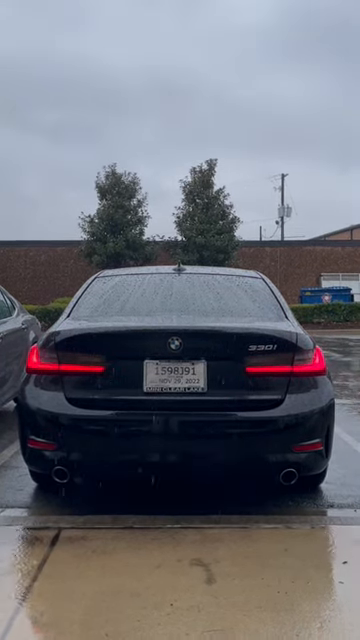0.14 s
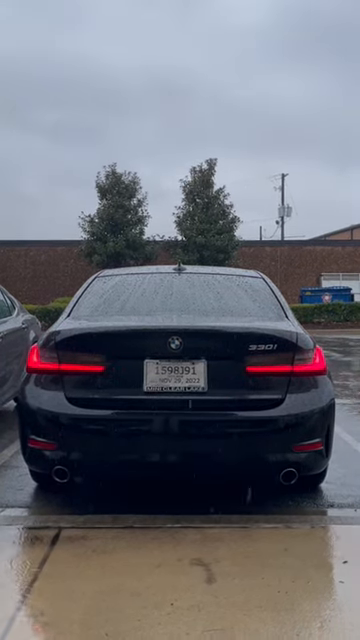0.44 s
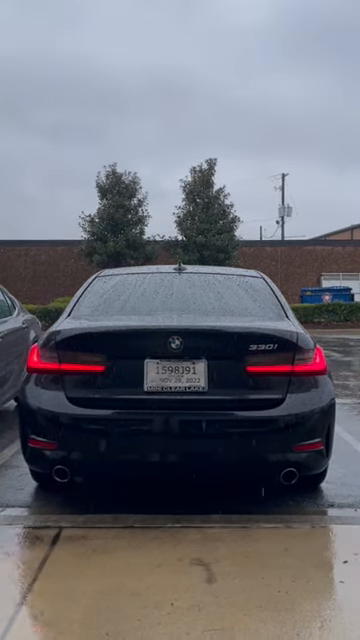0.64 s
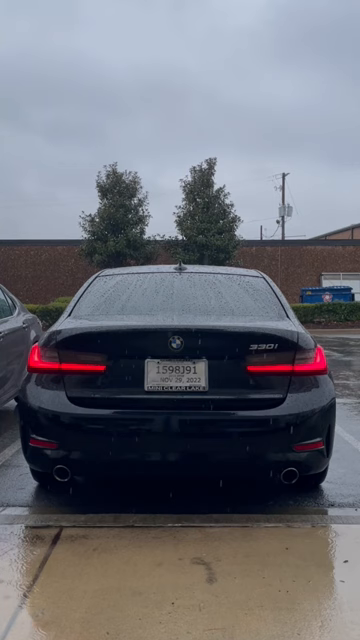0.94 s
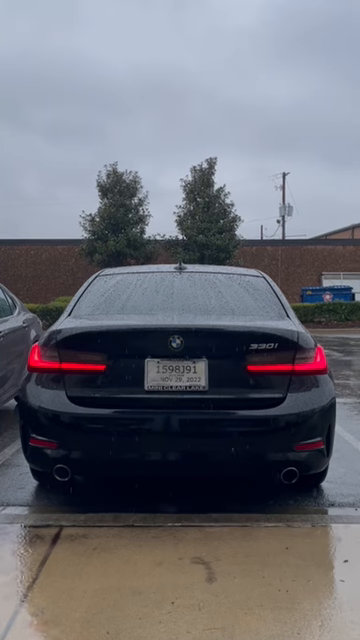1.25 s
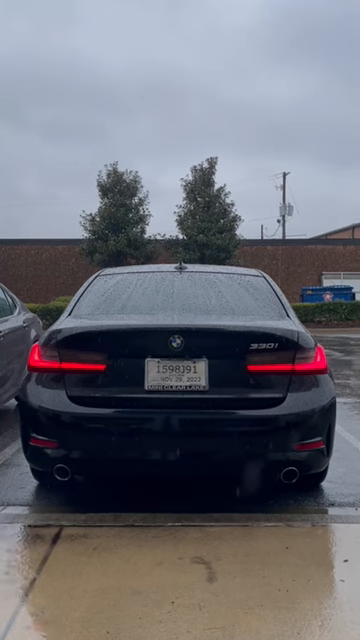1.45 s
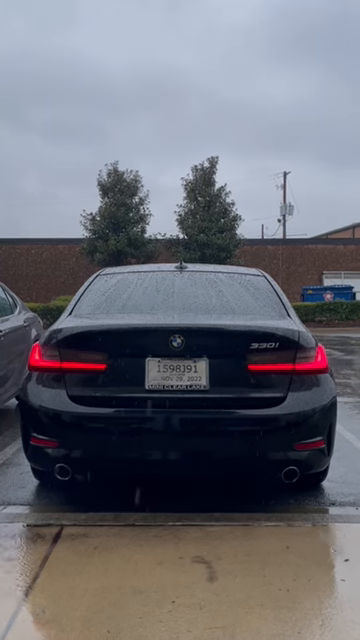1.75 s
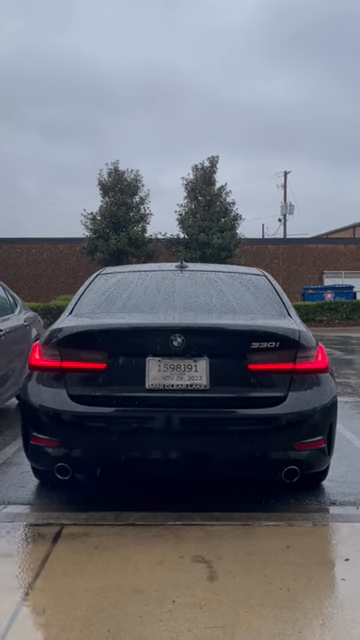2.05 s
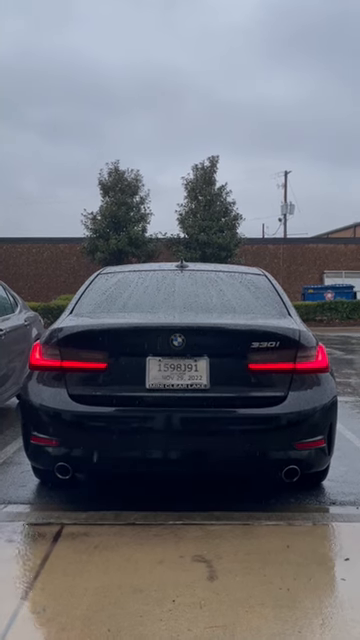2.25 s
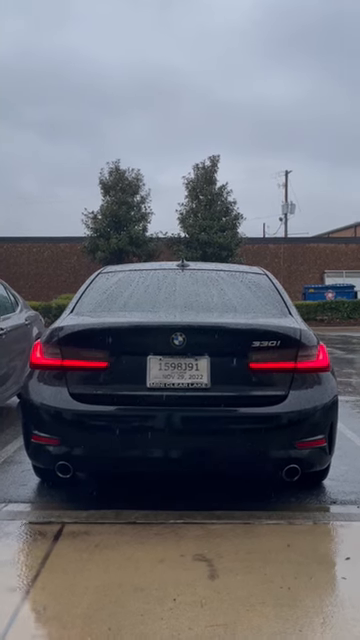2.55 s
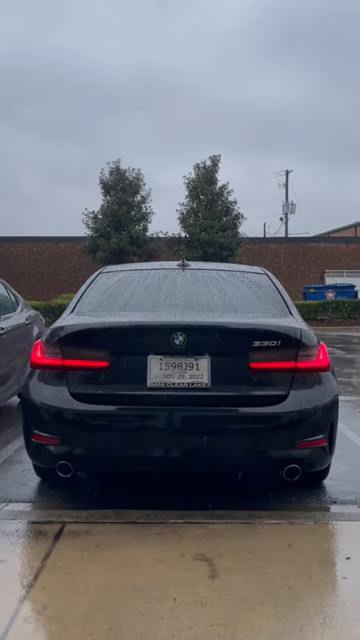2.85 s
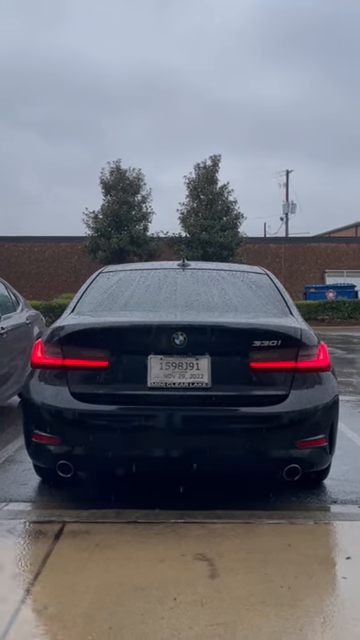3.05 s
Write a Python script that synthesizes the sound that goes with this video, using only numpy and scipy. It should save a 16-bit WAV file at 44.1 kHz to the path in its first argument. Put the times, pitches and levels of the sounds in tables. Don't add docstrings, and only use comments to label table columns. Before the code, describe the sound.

Car engine idling low and throaty from its tailpipes while rain hisses and drips around it

```python
import sys
import numpy as np
from scipy import signal
from scipy.fft import rfft, irfft
from scipy.io import wavfile
from scipy.ndimage import uniform_filter1d

SR = 44100
rng = np.random.default_rng(int(sys.argv[2]) if len(sys.argv) > 2 else 0)


def persist_wave(psi):
    counts = np.round(np.clip(psi, -1, 1) * 32767).astype(np.int16)
    wavfile.write(sys.argv[1], SR, np.atleast_2d(counts).T)


def volts(x):
    e = np.asarray(x, float) / 20
    return 10 ** e


N = 141120


def curve(table, col):
    points = np.array(table, float)
    return np.interp(np.arange(N) / SR, points[:, 0], points[:, col])


def level(x, db):
    return x * volts(db) / np.sqrt(np.mean(x ** 2))


def band(x, hz, width):
    return signal.lfilter(*signal.iirpeak(min(hz, .45 * SR), hz / width, fs=SR), x)


def shape(table):
    points = np.array(table, float)
    hz = np.arange(N // 2 + 1) * SR / N
    return np.interp(np.log(hz + 1), np.log(points[:, 0]), points[:, 1])


def walk(rate):
    hold = int(SR / rate)
    steps = np.repeat(rng.standard_normal(N // hold + 1), hold)
    return 1.3 * uniform_filter1d(uniform_filter1d(steps, hold), hold)[:N]


def engine():
    # (time [s], firing rate [Hz], load [dB], boom of the resonances near 88, 125 and 233
    # Hz [dB], drone shared by most resonances [dB])
    idle = [(0, 45.33, -17, -2.5, -14), (.16, 45.08, -22.5, 1.5, -8.5), (.33, 43.98, -24.5, 7.5, -8),
            (.5, 42.9, -23.5, -5.5, 2.5), (.65, 42.16, -21, 7, -24), (.78, 41.1, -21.5, 3, -9.5),
            (.92, 40.8, -26, -1, 0), (1.3, 40.53, -24.5, -0.5, -3.5), (1.47, 40.88, -23, -3, 1),
            (1.72, 41.47, -27, 3, -4), (2, 42.18, -22, -1, -6), (2.22, 42.16, -24.5, 3, -7.5),
            (2.53, 41.66, -20, -2.5, -6.5), (2.68, 40.77, -24.5, -1, -4.5), (2.88, 39.8, -24.5, -5, 3),
            (3.2, 40.03, -28, 0, -3.5)]
    # (pitch [Hz], width [Hz], level [dB], share of boom [ratio], share of drone [ratio])
    pipe = [(46.6, 8, 0.5, 0, 0.13), (88.4, 15.3, 2.5, 1., 0.39), (124.8, 19.6, 1.5, 0.44, 0.46),
            (159.7, 10.6, 0, 0, .6), (232.7, 13.2, -10, 2, 0.053), (248.4, 25.4, 2.5, 0, 0.73),
            (290.2, 15.8, -12.5, 0, 0.33), (337.5, 23, -12, 0, 0), (463.5, 27.4, -13, 0, 0.22),
            (506.4, 14.2, -9, 0, 0.12), (596.2, 23.3, -20.5, 0, 0.25), (890, 19.3, -29, 0, 0),
            (1069, 107, -34, 0, 0.34)]
    stagger = 0.027
    jitter_s, scatter_db = .00015, .7
    lead = int(.3 * SR)
    end = N + lead

    rate = np.pad(curve(idle, col=1), (lead, 0), "edge")
    phase = np.cumsum(rate) / SR
    firing = np.arange(1, 200)
    timing_chance, size_chance = rng.standard_normal((len(firing), 2)).T
    at = np.interp(firing + stagger * (firing % 2), phase, np.arange(end), right=end)
    at = np.clip(at + jitter_s * SR * timing_chance, 0, end)
    size = volts(scatter_db * size_chance)

    pulses = np.zeros(end + 2)
    np.add.at(pulses, at.astype(int), size * (1 - at % 1))
    np.add.at(pulses, at.astype(int) + 1, size * (at % 1))
    pulses = pulses[:end] * SR / 2 / rate

    boom, drone = curve(idle, col=3), curve(idle, col=4)
    ringing = 0
    for hz, width, db, boom_share, drone_share in pipe:
        gain = volts(db + boom_share * boom + drone_share * drone + .7 * walk(9))
        ring = band(band(pulses, hz, 1.084 * width), hz, 1.084 * width)[lead:]
        ringing = ringing + np.sign(hz - 60) * gain * ring

    puff = np.exp(-(phase[lead:] % 1))
    gas = level(puff * band(rng.standard_normal(N), 505, 460), -46.5)
    load = curve(idle, col=2)
    return volts(load - 2) * ringing + volts(load - load.mean()) * gas


def hums():
    # (time [s], pitch [Hz], level [dB])
    hum = [
        (0, 146, -29),
        (.2, 138.7, -30),
        (.4, 137.7, -32.5),
        (.65, 131.3, -41.5),
        (.9, 126.7, -33),
    ]
    # (start [s], length [s], pitch [Hz], level [dB])
    whines = [
        (0.536, .17, 1855, -57),
        (0.643, .09, 890, -46),
    ]
    fade_db_s, start_phase, edge_s = 86, 2.82, 0.007

    t = np.arange(N) / SR
    hum_db = curve(hum, col=2) - fade_db_s * np.maximum(t - hum[-1][0], 0)
    turns = np.cumsum(curve(hum, col=1)) / SR
    out = np.sqrt(2) * volts(hum_db) * np.sin(2 * np.pi * turns + start_phase)
    for start, length, hz, db in whines:
        envelope = np.clip(np.minimum(t - start, start + length - t) / edge_s, 0, 1)
        out = out + np.sqrt(2) * volts(db) * envelope * np.sin(2 * np.pi * hz * t)
    return out


def rain():
    # (pitch [Hz], level [dB])
    shared_tone = [(200, 1.5), (450, -1.5), (1400, -18), (4800, -22), (8600, -24.5), (12500, -30),
                   (14500, -35.5), (15600, -53)]
    # (pitch [Hz], level [dB])
    side_tone = [(180, -23), (300, -8), (500, -1.5), (876, -8), (1660, -28), (2520, -18), (8480, -16.5),
                 (13700, -23)]
    link = 0.66

    early = -1.5 * np.exp(-np.arange(N) / SR / 0.11)
    swell = .5 * walk(3) + 1. * walk(25) + early
    shared, loose = 0, 0
    for hz in 200 * 2 ** np.arange(0, 6.6, .5):
        gain = volts(swell + 1.4 * walk(9))
        shared = shared + gain * band(rng.standard_normal(N), hz, hz / 2.17)
        loose = loose + gain * band(rng.standard_normal(N), hz, hz / 2.2)
    mid = irfft(rfft(shared) * volts(shape(shared_tone)), N)
    side = 1j * link * rfft(shared) + np.sqrt(1 - link ** 2) * rfft(loose)
    side = irfft(side * volts(shape(side_tone)), N)
    return level(mid, -43), level(side, -45)


def rumble():
    far = band(band(rng.standard_normal(N), 68, 60), 68, 60)
    water = band(band(rng.standard_normal(N), 2590, 150), 2590, 150)
    trickle = volts(3.7 * walk(4)) * water
    return level(far, -45) + level(trickle, -62.5)


def drips():
    # (time [s], peak level [dB], pitch [Hz])
    clear = [(0.0388, -39, 2690), (0.1135, -47.5, 2750), (0.1765, -49.5, 2840), (0.3068, -38, 4200),
             (0.3502, -34.5, 3340), (0.374, -35.5, 4340), (0.5097, -36, 4370), (0.6558, -39.5, 4820),
             (0.6872, -36, 4360), (0.802, -44.5, 4660), (0.9468, -36, 5160), (1.05, -32, 3610),
             (1.1573, -35, 5140), (1.4162, -36, 4555), (1.6736, -38, 3790), (1.8607, -36, 4720),
             (1.9006, -35.5, 5270), (1.97, -37, 4810), (2.113, -37, 4030), (2.2553, -38, 3610),
             (2.2722, -39.5, 3987), (2.421, -36.5, 4070), (2.5326, -37, 4563), (2.7737, -39, 3884),
             (2.828, -40, 3812), (2.842, -37, 4093), (2.9123, -38, 2650), (3.0785, -46, 5030)]
    # (time [s], peak level [dB], pitch [Hz])
    splat = [
        (.3762, -29, 4400),
        (.3775, -36, 2200),
        (.3805, -33, 5100),
        (.382, -37, 3200),
        (.3848, -28, 4700),
        (.401, -41, 4500),
    ]
    drip_s, splat_s = .007, .0025
    glide = 2.3
    low_hz, high_hz = 2206, 8910

    out, t = np.zeros(N + 2048), np.arange(2048) / SR
    when, strength, pitch = rng.random((400, 3)).T
    faint_db = -41.5 - 9.5 - 4 * np.log(strength + 0.061)
    faint = zip(when * N / SR, faint_db, low_hz * (high_hz / low_hz) ** pitch)
    drops = [(s, db - 4, hz, drip_s) for s, db, hz in list(clear) + list(faint)]
    drops += [(*row, splat_s) for row in splat]
    for s, db, hz, fade in drops:
        noise = rng.standard_normal(2048)
        splash = level(band(band(noise, hz, .3 * hz), hz, .3 * hz), -1)
        bubble = np.sin(2 * np.pi * hz * t * (1 + glide * t))
        envelope = (1 - np.exp(-t / .0008)) * np.exp(-t / fade)
        drop = envelope * (bubble + splash)
        i = int(s * SR)
        out[i:i + 2048] += volts(db) * drop / np.abs(drop).max()
    return out[:N]


def scene():
    # (pitch [Hz], level [dB])
    lean_tone = [(60, 0), (110, .5), (200, 1), (380, 2.5), (700, 6.5), (1290, 4), (2380, 0), (4400, -1.5),
                 (8120, 0)]
    # (pitch [Hz], level [dB])
    cancel_tone = [(8500, 3), (9300, -14), (10400, -30), (11400, -2), (12600, 6.5)]
    port_lag_s, side_top_hz = 4e-5, 13800

    hz = np.arange(N // 2 + 1) * SR / N
    car = rfft(engine() + hums() + rumble())
    drops = rfft(drips())
    mid, side = rain()
    lean = volts(shape(lean_tone) / 2)
    turn = lean * np.exp(1j * np.pi * hz * port_lag_s)
    mid = (rfft(mid) + drops) * volts(shape(cancel_tone))
    side = (rfft(side) + 1j * volts(-4.5) * drops) * (hz < side_top_hz)
    first = car * turn + mid * lean + side
    second = car / turn + mid / lean - side
    return irfft(np.array([first, second]), N)


def low_pass(x):
    return signal.sosfilt(signal.butter(12, 15650, fs=SR, output="sos"), x)


def record(dry):
    x = signal.sosfilt(signal.butter(3, 32, "high", fs=SR, output="sos"), dry)
    return low_pass(x)


dry = scene()
out = record(dry)
persist_wave(out)
```